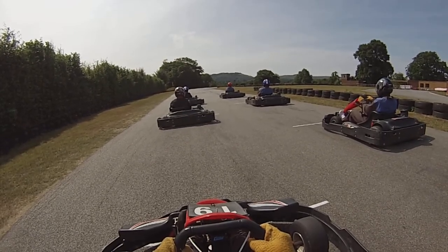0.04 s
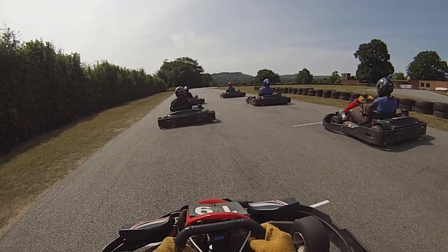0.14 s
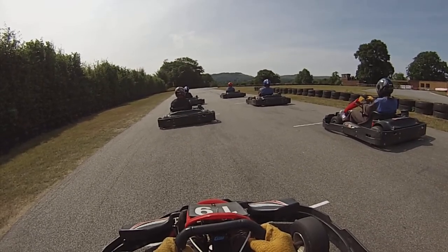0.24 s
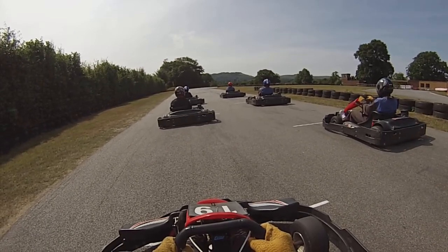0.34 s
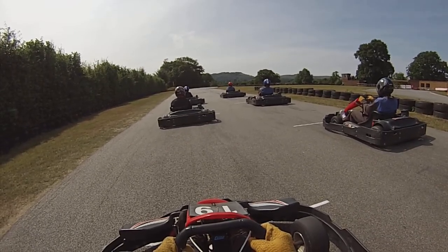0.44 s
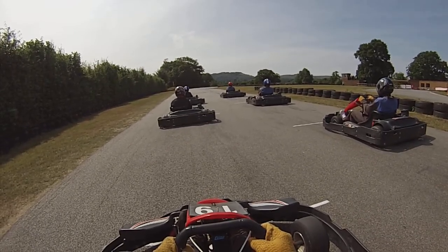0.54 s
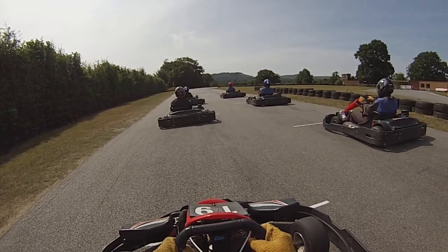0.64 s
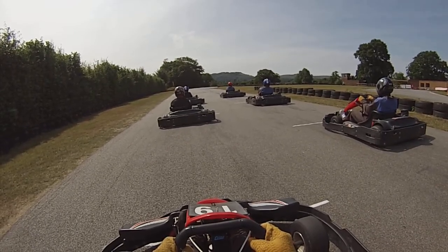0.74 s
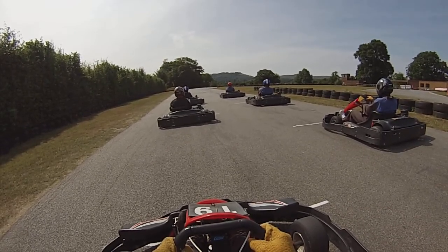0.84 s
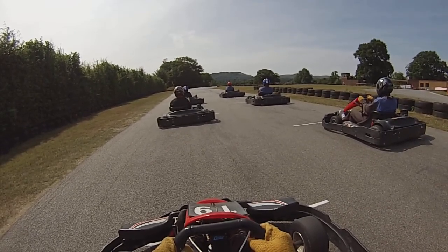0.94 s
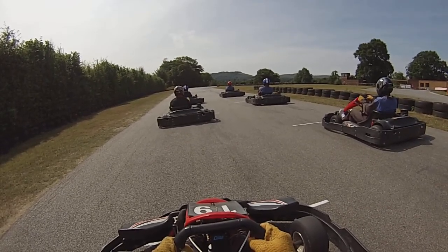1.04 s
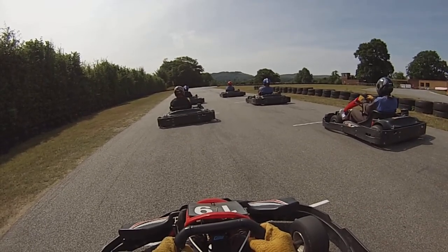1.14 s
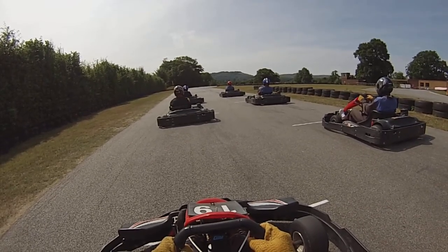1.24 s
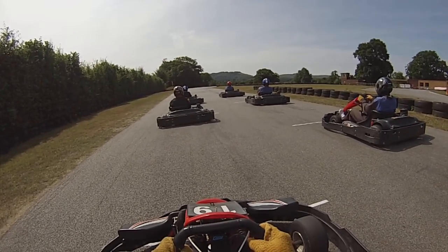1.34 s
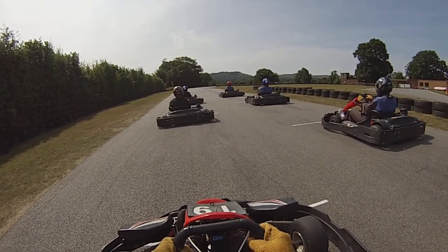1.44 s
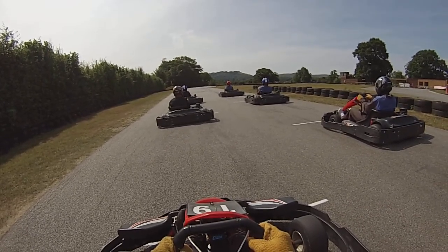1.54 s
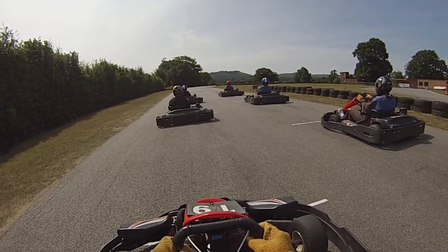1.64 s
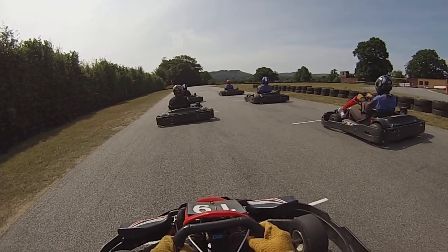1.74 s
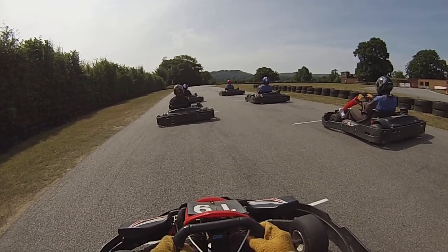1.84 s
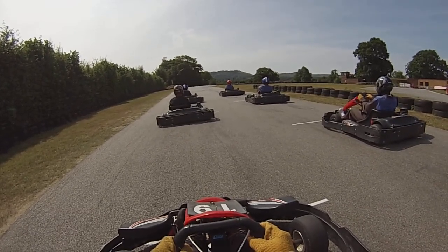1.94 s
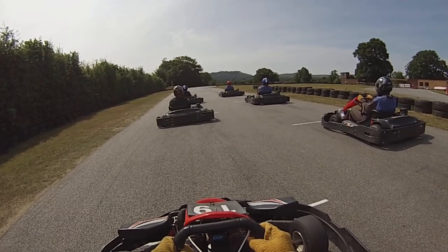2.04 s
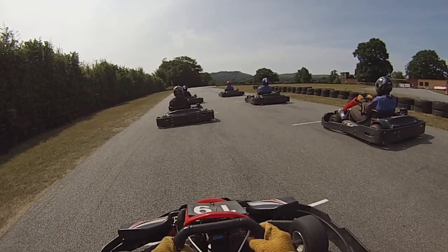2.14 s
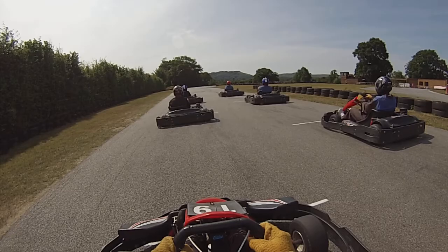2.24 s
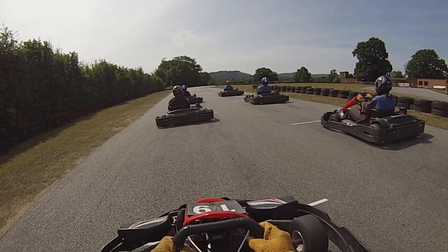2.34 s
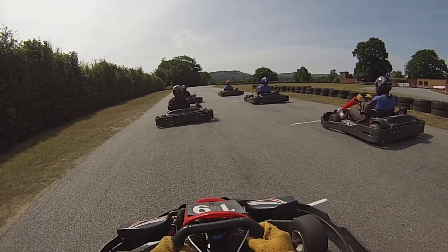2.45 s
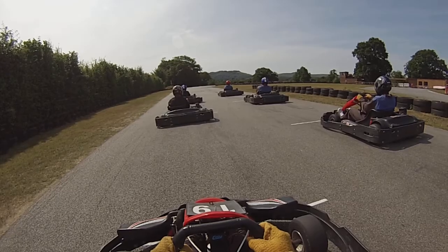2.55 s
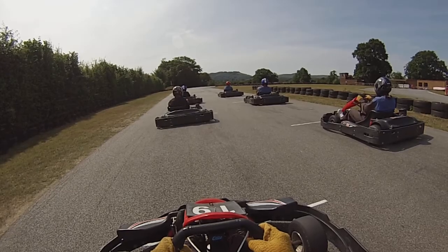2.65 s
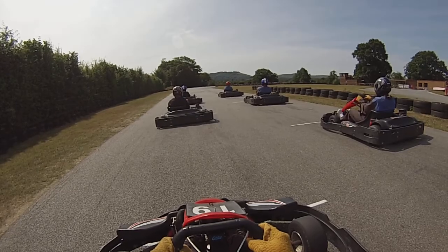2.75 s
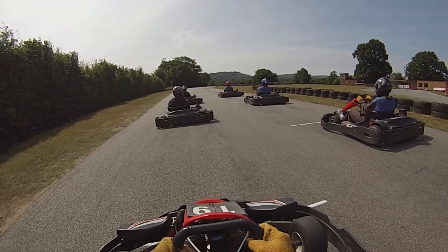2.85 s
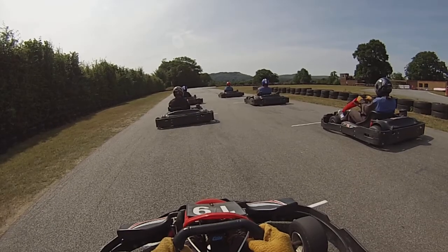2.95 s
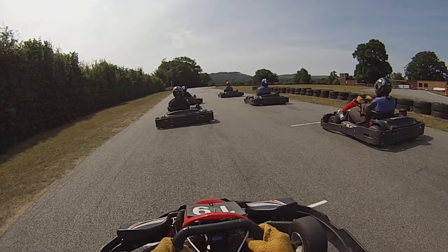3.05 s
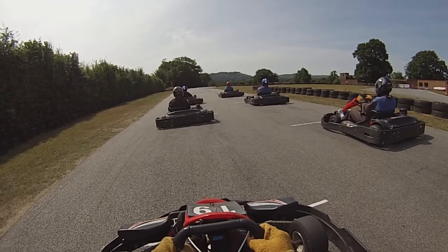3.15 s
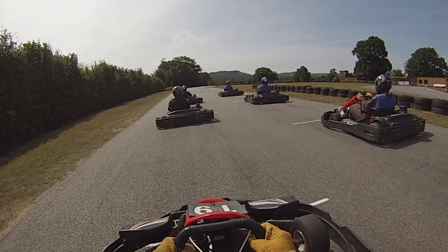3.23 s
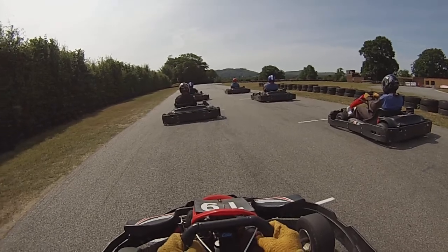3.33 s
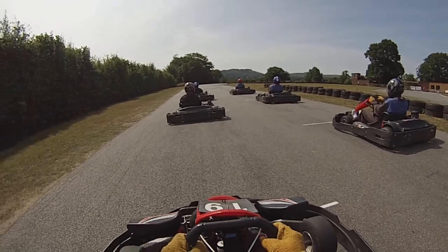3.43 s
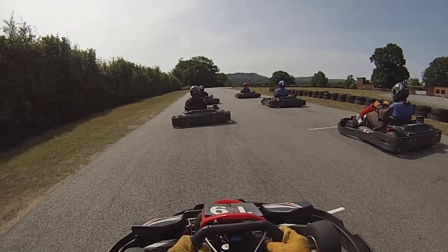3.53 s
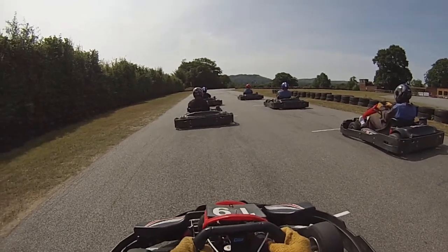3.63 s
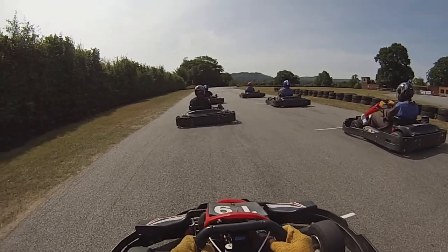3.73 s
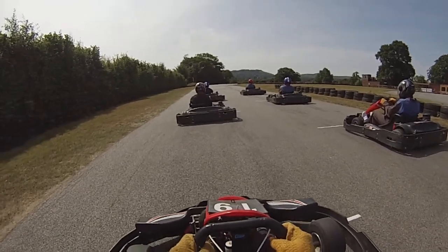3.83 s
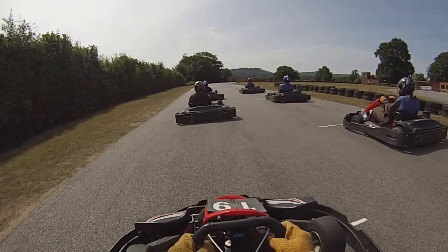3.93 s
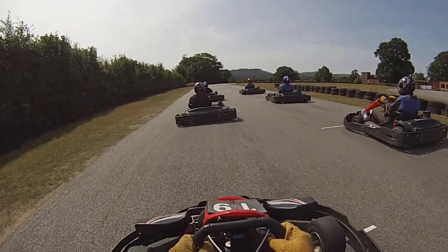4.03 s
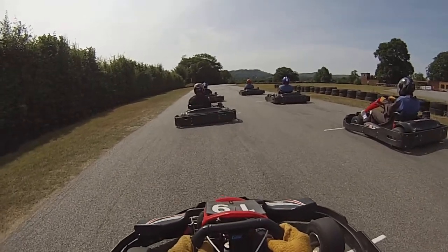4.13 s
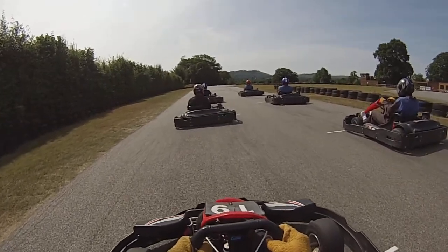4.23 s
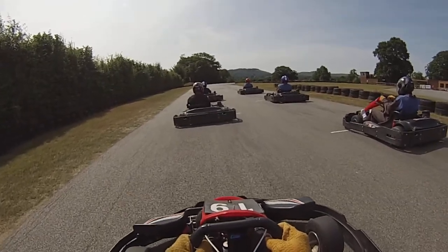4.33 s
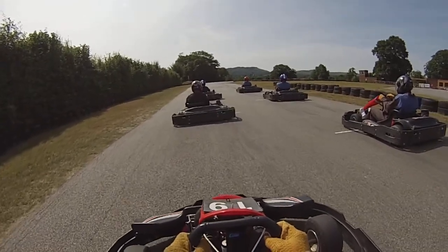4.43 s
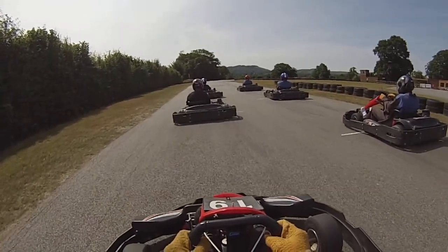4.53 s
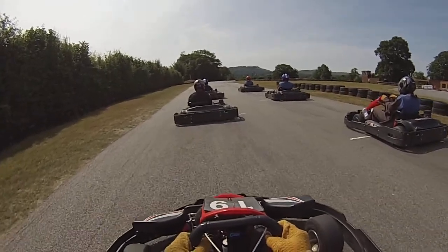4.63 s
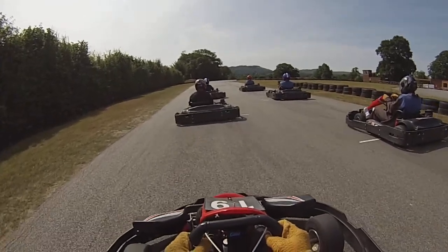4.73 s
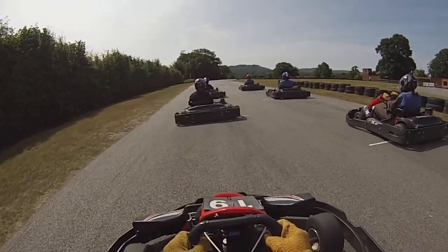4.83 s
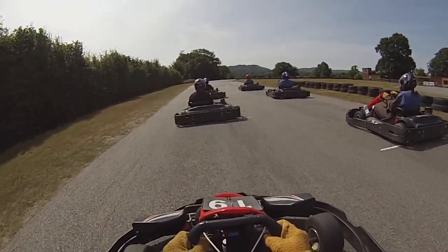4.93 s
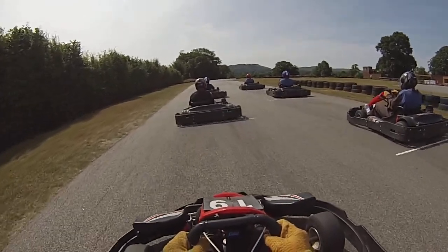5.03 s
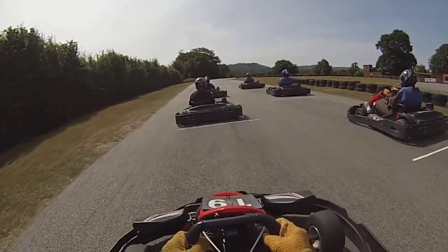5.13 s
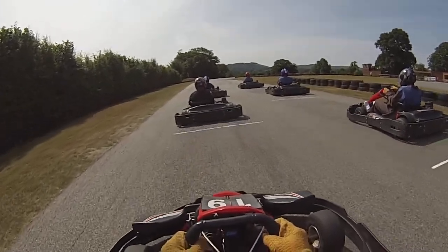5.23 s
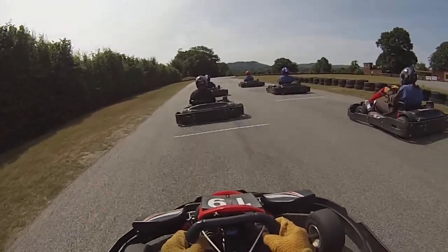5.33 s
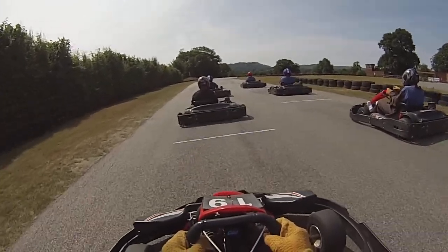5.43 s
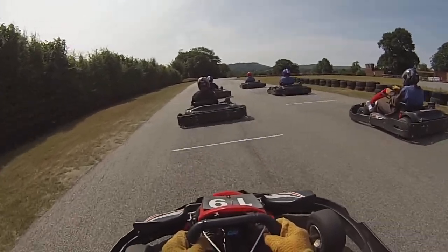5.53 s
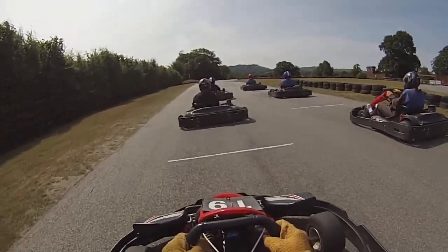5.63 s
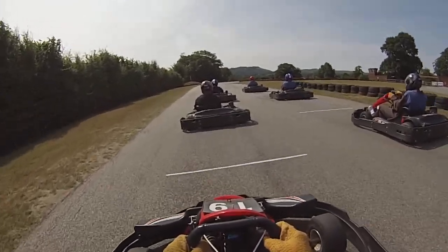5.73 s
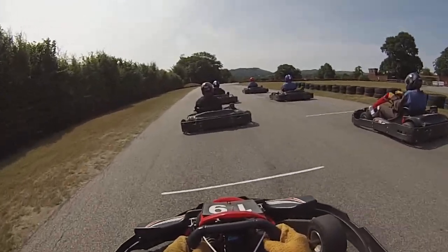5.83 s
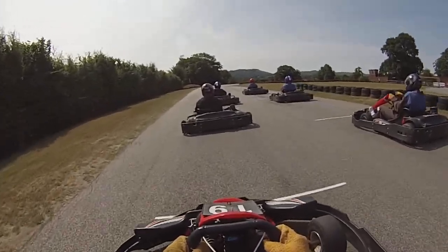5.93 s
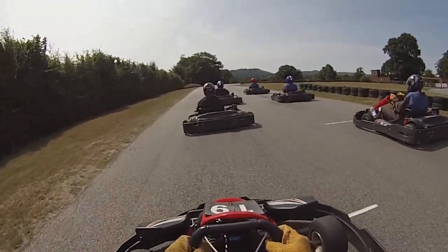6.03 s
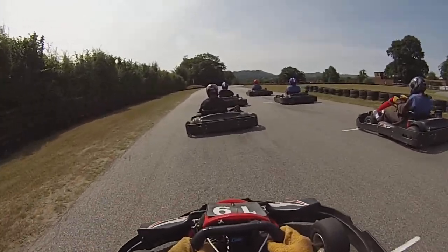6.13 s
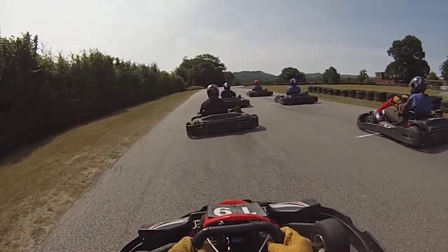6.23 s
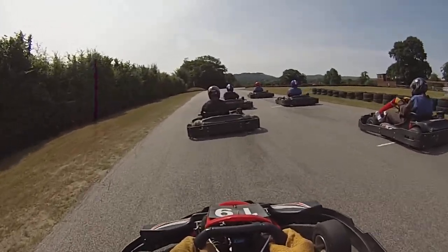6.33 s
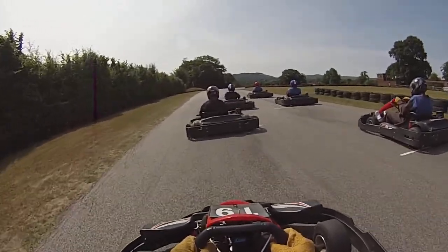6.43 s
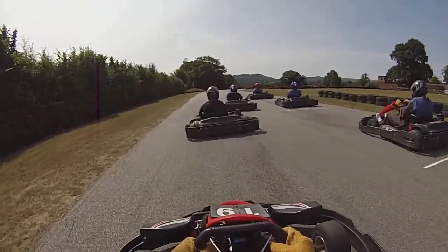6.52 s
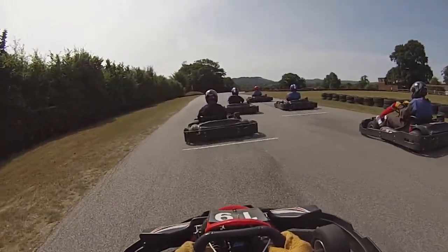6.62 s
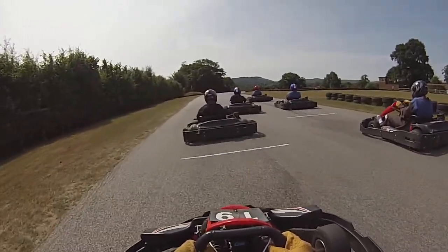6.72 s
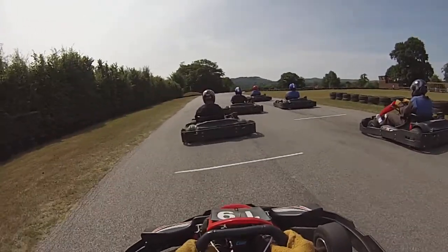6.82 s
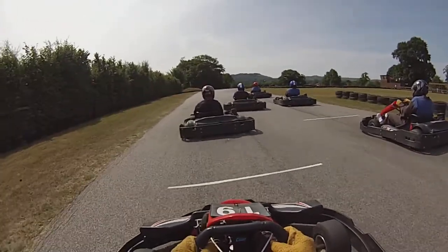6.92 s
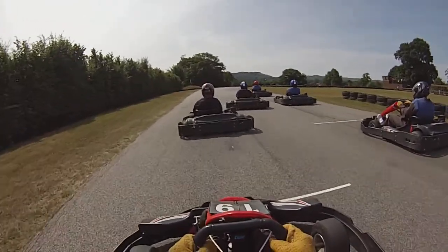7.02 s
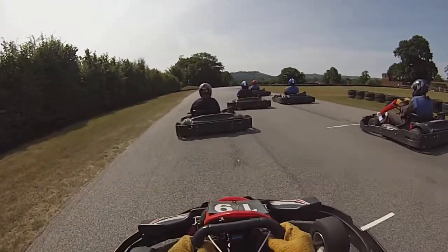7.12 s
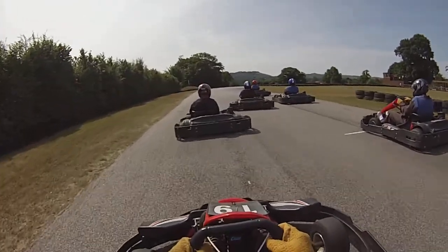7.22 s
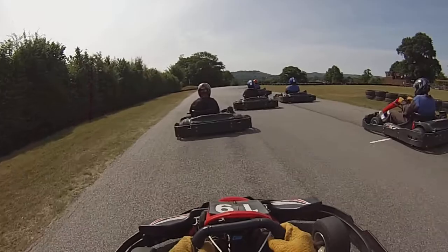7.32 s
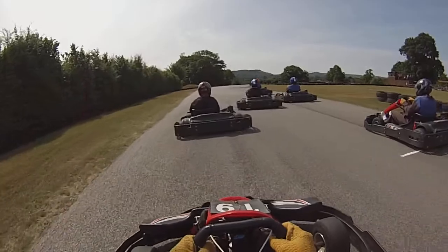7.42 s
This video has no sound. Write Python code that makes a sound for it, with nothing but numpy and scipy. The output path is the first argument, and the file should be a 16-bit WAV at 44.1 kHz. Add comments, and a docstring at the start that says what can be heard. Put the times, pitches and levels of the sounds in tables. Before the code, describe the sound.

A small single-cylinder engine idles close behind, slow separate putts with light valve clicks over a low rumble of other karts. After about three seconds it gasps and stumbles, then leaps much louder and quicker into a rough, buzzing drone with hard metallic knocks. It holds nearly steady as the kart rolls, and a faint whine rises at the end. Outdoor track, microphone boxed in a plastic housing on the kart.

```python
"""On a kart track, close to a single-cylinder four-stroke engine, inside a camera's closed plastic housing:
the engine idles just behind, then the throttle opens and its speed climbs.
Crank-locked tones shake the frame, sums of firing orders pop in the exhaust, and enveloped noise and
tone bursts make the valve gear, knocks and gas, much of it ringing in the housing.
Other karts drone ahead as shaped noise, and a wavering sine whines as the kart rolls."""
import sys
import numpy as np
from scipy import signal
from scipy.io import wavfile
from scipy.ndimage import uniform_filter1d

SR = 44100
rng = np.random.default_rng(int(sys.argv[2]) if len(sys.argv) > 2 else 0)


def waveform_to_disk(signal):
    """Save audio, clipped to [-1, 1], as 16-bit WAV at the path in sys.argv[1]."""
    frames = np.transpose(np.atleast_2d(signal))
    scaled = np.clip(frames, -1, 1) * 32767
    samples = np.round(scaled).astype(np.int16)
    wavfile.write(sys.argv[1], SR, samples)


N = 329427
T = np.arange(N) / SR
HZ = np.fft.rfftfreq(8192, 1 / SR)  # frequency grid of the colouring filters

# housing and frame resonances: (f/Hz, width at half power/Hz, relative level/dB)
RINGS = [(629, 25, -13.5), (1129, 69, -5), (1348, 67, 0), (1468.6, 43.6, 2.5), (1991, 41, -2.5),
         (2195, 82, -4), (2320, 61, -0.5), (2510, 260, -11.5), (2995, 89, -13)]


def amp(db):
    """Gain of a level in dB."""
    return np.exp(np.asarray(db) * (np.log(10) / 20))


def evened(x):
    """Sound scaled to rms 1."""
    return x / np.sqrt(np.mean(x ** 2) + 1e-20)


def steadied(x):
    """Unit level over a few cycles, so that a level curve can play the sound."""
    power = uniform_filter1d(uniform_filter1d(x ** 2, size=9000), size=9000)
    return x / np.sqrt(power + 1e-12)


def curves(rows):
    """Columns of a timed table, drawn as lines with one value a sample."""
    s, *columns = np.transpose(rows)
    return [np.interp(T, s, column) for column in columns]


def wander(per_s):
    """Random drift of rms 1 through per_s new values a second."""
    return evened(np.interp(T * per_s, np.arange(400), rng.standard_normal(400)))


def spectrum_gain(points):
    """Gain of a spectrum, with lines between its points on a log frequency axis."""
    hz, db = np.transpose(points)
    return amp(np.interp(np.log(HZ + 1), np.log(hz + 1), db))


def peaks(modes, floor_db):
    """Gain of a set of resonances whose powers add to a floor."""
    power = sum(amp(db) ** 2 / (1 + (2 * (HZ - hz) / width) ** 2) for hz, width, db in modes)
    return np.sqrt(power + amp(floor_db) ** 2)


def colour(x, gain):
    """Minimum-phase filter of the given gain, so that blows ring after they land."""
    log_gain = np.log(np.maximum(gain, 1e-5))
    log_gain = np.r_[log_gain, log_gain[-2:0:-1]]  # mirrored to negative frequencies
    response = np.exp(np.conj(signal.hilbert(log_gain)))
    taps = np.fft.ifft(response).real[:len(HZ)]
    return signal.oaconvolve(x, taps)[:N]


def through_shell(x):
    """Treble as the housing lets it in, through its high resonances."""
    # (f/Hz, width at half power/Hz, relative level/dB)
    high_rings = [(3514, 170, 3), (3976, 70, 7), (4580, 440, -2), (5280, 160, 0.5), (5660, 230, -1.5),
                  (6340, 350, -4), (7600, 660, -10.5), (8060, 140, -11.5), (10270, 540, -12.5),
                  (11400, 250, -17), (13500, 700, -43), (14700, 300, -44)]
    bass_cut = 1 / (1 + (2800 / (HZ + 1)) ** 6)
    return colour(x, peaks(high_rings, -60) * bass_cut / (1 + HZ / 9000))


def crank():
    """Crank angle in firing cycles (whole numbers fire), cycles a second, and load 0-1 as speed leaves idle."""
    # engine speed: (t/s, firing rate/Hz)
    speed = [(0.0, 12.98), (0.55, 12.71), (1.0, 13.08), (1.5, 12.83), (2.1, 13.3), (2.4, 13.14),
             (2.8, 13.62), (3.2, 13.38), (3.28, 14.3), (3.34, 18.02), (3.42, 20.01), (3.8, 22.08),
             (4.2, 22.53), (4.75, 23.33), (5.2, 23.3), (6.0, 23.67), (7.47, 23.69)]
    start_angle = -.35  # cycles
    rate, = curves(speed)
    load = np.clip((rate - 14) / 2, 0, 1)
    return start_angle + np.cumsum(rate) / SR, rate, load


def bursts(at, idle_db, load_db, rise_ms, decay_ms, spread_db, slop, hz=0):
    """Envelope, or tone burst if hz is given, from one crank angle a cycle, varying in size and delay."""
    angle, rate, load = crank()
    cycle = np.floor(angle - at).astype(int) + 2
    size, late = rng.standard_normal((200, 2)).T
    since = np.maximum((angle - at) % 1 - slop * abs(late[cycle]), 0)  # cycles since the start
    ms = since / rate * 1000
    envelope = (1 - np.exp(-ms / rise_ms)) ** 2 * np.exp(-ms / decay_ms)
    level_db = idle_db + (load_db - idle_db) * load + spread_db * size[cycle]
    return amp(level_db) * envelope * np.cos(2 * np.pi * hz * ms / 1000)


def drone():
    """The other engines and the rolling chassis blur into a lumpy rumble of shaped noise."""
    # spectra idling and rolling, before the layer level: (f/Hz, relative level per Hz/dB)
    idle_spectrum = [(5, 11), (12, 32), (30, 21), (60, 23.5), (93, 19.5), (160, 19.5), (244, 10.5),
                     (350, 8), (467, 2.5), (726, -2.5), (1100, 4.5), (1500, 3), (2600, -94)]
    rolling_spectrum = [(5, -28), (12, 27), (33, 18), (59, 11.5), (90, 14.5), (130, 9.5), (270, 6.5),
                        (330, 7.5), (450, 0), (700, -1.5), (1100, -1.5), (1500, -28), (2600, -83)]
    load = crank()[2]
    idle = colour(rng.standard_normal(N), spectrum_gain(idle_spectrum))
    rolling = colour(rng.standard_normal(N), spectrum_gain(rolling_spectrum))
    return ((1 - load) * idle + load * rolling) * amp(0.78 * wander(25))


def whine():
    """A tone that rises with road speed, fuzzy from random drift in pitch and level."""
    # (t/s, f/Hz, rms level/dB)
    glide = [(6.42, 770, -51), (6.55, 788, -48), (6.7, 794, -47), (6.82, 835, -44), (6.95, 864, -48),
             (7.08, 898, -44), (7.22, 918, -38), (7.35, 965, -39.5), (7.47, 990, -46)]
    hz, db = curves(glide)
    phase = np.cumsum(hz * (1 + 0.011 * wander(50))) / SR
    started = T > glide[0][0]
    return np.sqrt(2) * started * amp(db + 1.2 * wander(40)) * np.sin(2 * np.pi * phase)


def gasps():
    """The intake gasps as the throttle snaps open: short enveloped rushes of noise."""
    # (t/s, level before the envelope/dB, rise time constant/ms, decay time constant/ms)
    rushes = [(3.161, -50, 2, 14), (3.193, -49, 1.8, 11), (3.248, -52, 2.4, 13), (3.268, -48, 2.4, 14),
              (3.348, -47, 2, 10)]
    noise = evened(through_shell(rng.standard_normal(N)))
    gate = np.zeros(N)
    for s, db, rise_ms, decay_ms in rushes:
        ms = np.maximum(T - s, 0) * 1000
        gate = gate + amp(db) * (1 - np.exp(-ms / rise_ms)) * np.exp(-ms / decay_ms)
    return gate * noise


def hiss():
    """Gas rushes past the valves in puffs over a hiss, thinner and brighter at idle."""
    # puffs of gas at the valves, levels before the layer level:
    # (crank angle/cycles, idle level/dB, load level/dB, rise time constant/ms, decay time constant/ms)
    puffs = [(-0.14, -12, 13.5, 4.6, 5.05), (0.45, 5.5, -3, 1.65, 6.4), (0.15, -2, -2, 2.8, 5.9)]
    load = crank()[2]
    low = 1 / (1 + (HZ / 7500) ** 6)
    rush = 0
    for band in (np.sqrt(low), np.sqrt(1 - low)):  # each puff gets its own balance of low and high hiss
        gate = amp(-13.5) + sum(bursts(*row, spread_db=1.2, slop=0.011) for row in puffs)
        rush = rush + colour(gate * amp(0.81 * wander(50)) * rng.standard_normal(N), band)
    whistle = 1 + 1.5 / (1 + ((HZ - 8000) / 900) ** 2) + (HZ / 13000) ** 3
    idle = colour(through_shell((1 - load) * rush), 0.45 * whistle)
    return through_shell(load * rush) + idle


def tappet():
    """Valves seat with short clacks, tone bursts at set crank angles; under load one rings high before firing."""
    early = bursts(.23, 3.6, -7, 1.0, 3.7, spread_db=2.5, slop=0.0055, hz=1388)
    middle = bursts(.5, -3, -7, 0.3, 1.8, spread_db=5.0, slop=0.0083, hz=2440)
    high = bursts(-0.1, -45, -14.5, 0.46, 3.1, spread_db=2.5, slop=.03, hz=5610)
    return early + middle + high


def rattle():
    """Noise knocks near fixed crank angles and loose clatter between them ring the housing."""
    # blows in each cycle, levels before the layer level: (crank angle/cycles, idle level/dB, load level/dB,
    # rise time constant/ms, decay time constant/ms, centre f/Hz, distance to 1/e gain/octaves)
    knocks = [(-.04, -27, -1.5, 2.78, 4.76, 2050, 2.3), (.13, 0.5, -25, 0.45, 1.8, 820, 0.69),
              (.22, -7.5, -16, 0.36, 4.4, 1374, 0.3), (.2, -11.5, -19, 1.75, 10.9, 2350, 0.7),
              (0.362, -4.5, -4.5, 1.2, 2.72, 1500, 0.47), (.5, -9.5, -22, 0.31, 2.6, 2460, 0.23)]
    octaves = np.log2(HZ + 1)
    tick_size = amp(2.2 * np.minimum(rng.exponential(1, N), 3.0))
    ticks = rng.random(N) < 3500 / SR  # about 3500 a second
    x = amp(-16.5) * evened(tick_size * ticks * rng.choice([-1., 1.], N))
    for at, idle_db, load_db, rise_ms, decay_ms, hz, width in knocks:
        gate = bursts(at, idle_db, load_db, rise_ms, decay_ms, spread_db=1.0, slop=0.014)
        blow = gate * rng.standard_normal(N)
        x = x + amp(7.0) * colour(blow, np.exp(-((octaves - np.log2(hz)) / width) ** 2))
    bass_cut = HZ ** 2 / (HZ ** 2 + 500 ** 2)
    return colour(x, peaks(RINGS, -20.5) * bass_cut / (1 + (HZ / 3600) ** 4))


def bangs():
    """The hardest firings bang through the frame: noise bursts ring the housing, favouring its upper modes."""
    # (t/s, level before the envelope/dB)
    hits = [(3.3018, -19), (3.36, -18.5), (3.4619, -22), (3.5577, -18.5), (3.6038, -17.5), (3.7023, -15.5),
            (4.022, -16), (4.981, -23), (5.156, -17.5), (5.323, -20), (5.4514, -24), (5.5375, -17),
            (5.624, -22), (5.664, -24), (6.1303, -19), (6.1734, -18), (6.216, -17), (6.26, -15),
            (6.298, -14.5), (6.343, -13.5), (6.4676, -16), (6.511, -15), (6.5944, -14.5), (6.636, -19),
            (6.726, -17), (6.7634, -13.5), (7.143, -19), (7.269, -17)]
    s, db = np.transpose(hits)
    blows, ms = np.zeros(N), np.arange(2000) / SR * 1000
    blows[np.round((s - .0015) * SR).astype(int)] = amp(db)  # each starts 1.5 ms ahead of its listed time
    gate = signal.oaconvolve(blows, (1 - np.exp(-ms / 2.15)) * np.exp(-ms / 5.6))[:N]
    gain = peaks(RINGS, -26.5) * np.exp(-(np.log2((HZ + 1) / 2300) / 1.47) ** 2)
    return colour(gate * rng.standard_normal(N), gain / np.sqrt(np.mean(gain ** 2)))


def shaking():
    """Levels in dB of orders 1-4 of the firing rate, the upper two following the frame's response under load."""
    # order 1 in the frame: (t/s, rms level/dB)
    lurch = [(0, -62), (3.05, -52), (3.4, -24), (3.65, -48), (5.3, -63), (6.25, -49), (6.42, -24.5),
             (7.15, -28), (7.47, -42)]
    # order 2, once a crank turn: (t/s, rms level/dB)
    shake = [(0, -27.5), (.55, -40.5), (.75, -38), (.95, -28.5), (2.3, -31), (3.12, -26), (3.25, -34),
             (3.5, -18), (3.65, -22), (3.85, -19), (4.65, -20), (5.35, -18.5), (6.05, -21.5), (6.3, -21.5),
             (7.05, -20.5), (7.47, -28.5)]
    # orders 3 and 4 idling: rms level/dB
    idle_shake = [-43.5, -37.5]
    # frame response to orders 3 and 4 under load: (f/Hz, level relative to order 2/dB)
    response = [(58, -25), (63, -23), (65.5, -11), (68, -4.5), (71, -4), (80, -14), (86, -7.5), (89.5, -13),
                (92, -32), (95, -31)]
    _, rate, load = crank()
    (first_db,), (second_db,) = curves(lurch), curves(shake)
    upper = []
    for k, idle_db in enumerate(idle_shake, start=3):
        load_db = second_db + np.interp(k * rate, *np.transpose(response))
        upper.append(idle_db + (load_db - idle_db) * load)
    return [first_db, second_db] + upper


def frame():
    """Low orders as tones: they crest just after firing at idle and share a trough under load,
    which slips later in the cycle as the speed nears the frame's resonance."""
    angle, rate, load = crank()
    shift = uniform_filter1d(load, size=4000)
    crest = .06 + shift * np.interp(rate, [20.5, 23.3], [.42, .54])  # cycles after firing
    mix = 0
    for k, db in enumerate(shaking(), start=1):
        unsteady_db = .5 * wander(19)
        tone = np.cos(2 * np.pi * (k * (angle - crest) + shift / 2))
        mix = mix + np.sqrt(2) * amp(db + unsteady_db) * tone
    return mix


def exhaust():
    """One pop a firing, as a sum of orders of uneven strength, and a thud of turbulent gas."""
    # orders 5 and up, before the layer level: (idle level/dB, load level/dB)
    orders = [(-3, -1), (-3.5, 3.5), (-17, -0.5), (-4, -7.5), (4.5, -8.5), (3, -2), (5, -9.5), (-3.5, -16),
              (1, -6), (-0.5, -3), (-15, -37), (-10, -14.5), (-11, -14), (-35, -33), (-14.5, -28),
              (-13.5, -40), (-26, -17.5), (-22, -19.5), (-20, -16), (-20, -17.5), (-25, -14.5),
              (-26, -13.5)]
    angle, _, load = crank()
    strength_db = np.interp(angle, np.arange(-2, 198), rng.standard_normal(200)) * (1.8 - .9 * load)
    lag = .22 * (1 - load)  # cycles of each order: a step at idle, a spike under load
    pop = 0
    for k, (idle_db, load_db) in enumerate(orders, start=5):
        level_db = idle_db + (load_db - idle_db) * load + 1.0 * wander(3)
        pop = pop + amp(level_db) * np.cos(2 * np.pi * (k * angle - lag))
    gas_gain = np.exp(-(np.log2((HZ + 1) / 150) / 0.63) ** 2)
    gas = evened(colour(rng.standard_normal(N), gas_gain))
    thud = bursts(-0.2, 12.7, 4.8, 4.4, 12.6, spread_db=0.5, slop=0.022) * gas
    return pop * amp(strength_db) + thud


def levels():
    """Layer levels in dB follow the effort, grow with rolling, jump at the stumble and shift at the catch."""
    # rattle, hiss relative to it, exhaust, drone: (idle level/dB, load level/dB,
    # growth once rolling/dB per s, jump as the engine stumbles/dB, overshoot as it catches/dB)
    layers = [(-42.5, -31, .5, 3, -1.5), (-20, -14.5, 0, 6, 1), (-39.5, -28.5, 0.28, -3, -0.5),
              (-40, -26, 1.4, 6.5, 1.5)]
    # throttle effort: (t/s, effort from 0 idling to about 1 pulling hard)
    throttle = [(0, 0.017), (3.27, 0.047), (3.32, .7), (3.45, 0.84), (3.62, 0.83), (3.8, 0.97),
                (4.7, 1.045), (5.1, 1.003), (7.47, 0.99)]
    roll_s, stumble_s, stumble_width_s, catch_s, settle_s = 3.83, 3.2, 0.045, 3.3, 0.25
    effort, = curves(throttle)
    rolled_s = np.maximum(T - roll_s, 0)
    stumble = np.exp(-((T - stumble_s) / stumble_width_s) ** 2)
    catch = (T > catch_s) * np.exp(-np.maximum(T - catch_s, 0) / settle_s)
    return [idle_db + (load_db - idle_db) * effort + db_per_s * rolled_s + stumble_db * stumble + catch_db * catch
            for idle_db, load_db, db_per_s, stumble_db, catch_db in layers]


def scene():
    """All layers meet at one microphone, which feeds both channels."""
    rattle_db, hiss_db, exhaust_db, drone_db = levels()
    mix = amp(drone_db) * drone() + whine() + gasps() + bangs() + frame()
    mix += amp(exhaust_db) * steadied(exhaust())
    valve_gear = steadied(rattle()) + amp(8.5) * tappet()
    mix += amp(rattle_db) * (valve_gear + amp(hiss_db) * steadied(hiss()))
    return np.array([mix, mix])


def record(dry):
    """The recorder's band limit, a steep low-pass."""
    edge_hz = 15280
    taps = signal.firwin(511, edge_hz, window=("kaiser", 9), fs=SR)
    return signal.oaconvolve(dry, taps[None], "same")


dry = scene()
out = record(dry)
waveform_to_disk(out)
```